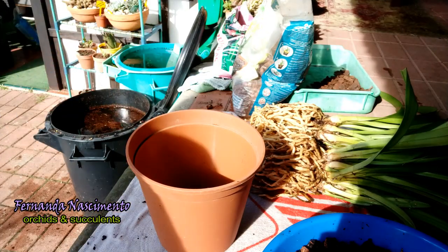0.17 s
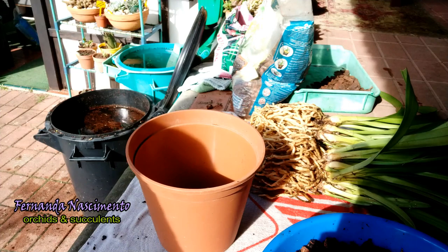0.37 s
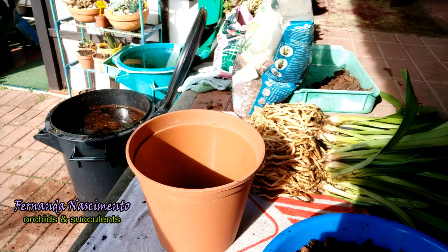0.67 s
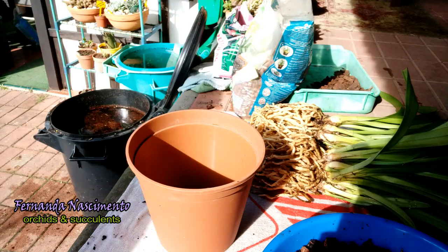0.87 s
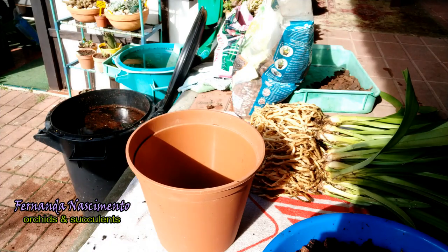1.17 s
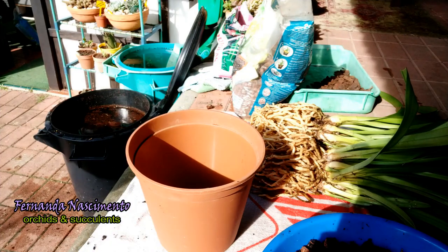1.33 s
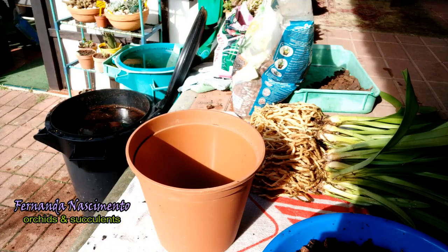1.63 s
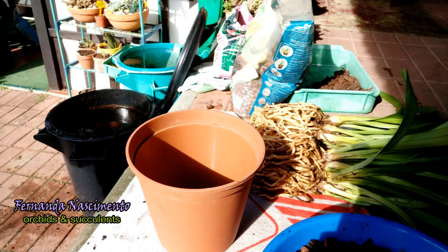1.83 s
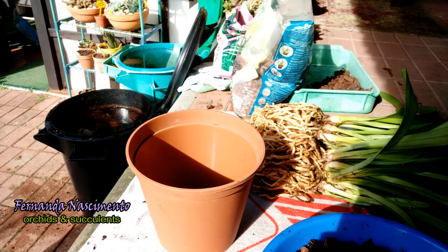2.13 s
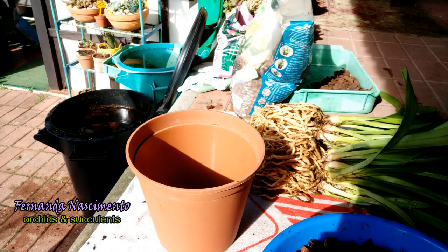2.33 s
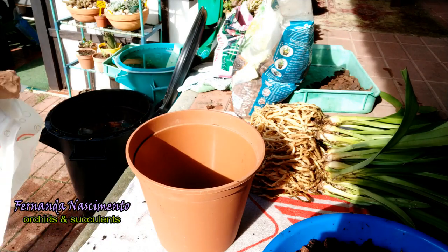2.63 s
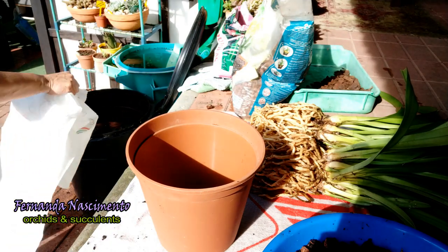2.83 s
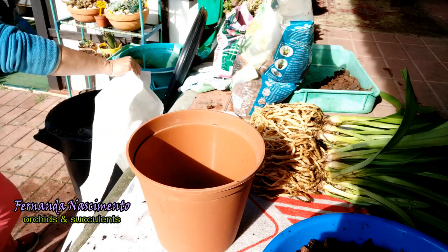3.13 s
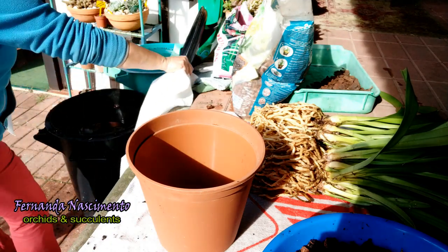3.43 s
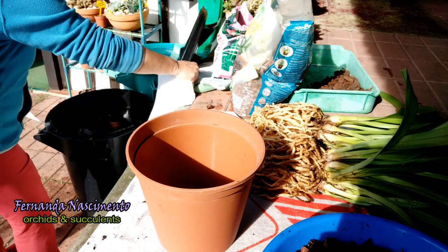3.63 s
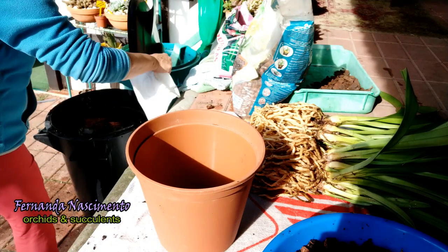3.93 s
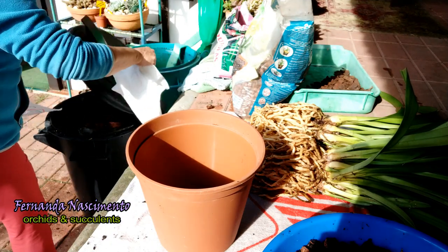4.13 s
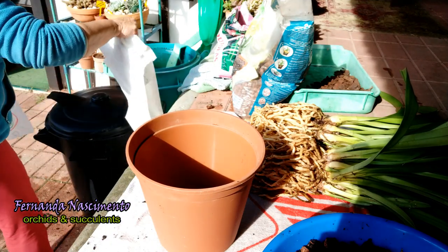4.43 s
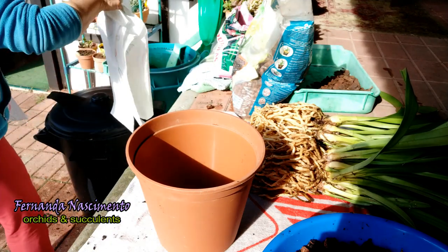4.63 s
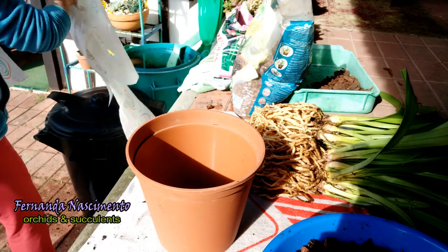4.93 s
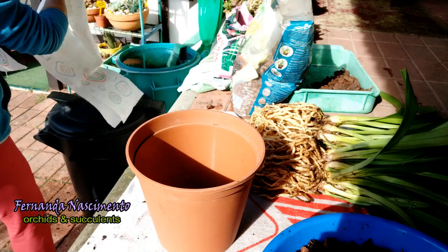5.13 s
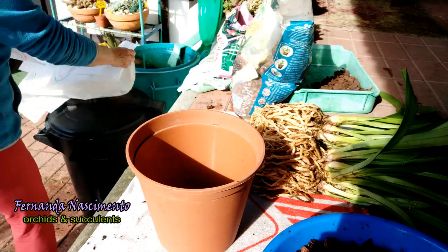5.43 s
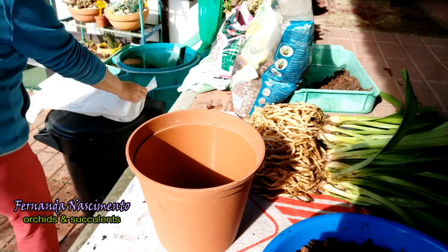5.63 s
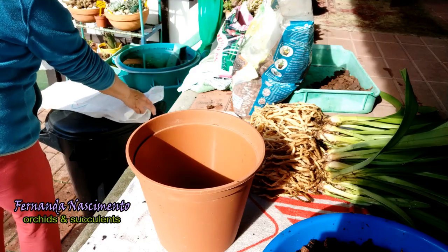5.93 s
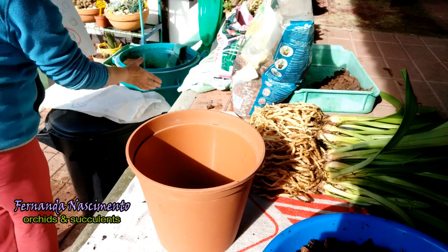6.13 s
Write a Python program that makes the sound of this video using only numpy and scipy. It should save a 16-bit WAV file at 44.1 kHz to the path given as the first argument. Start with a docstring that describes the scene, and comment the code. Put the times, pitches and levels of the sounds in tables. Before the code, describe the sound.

A quiet paved yard, heard close in stereo, with faint outdoor air and tiny distant bird chirps. From 0 to 0.5 s, small dull hollow knocks, strongest near 0.25 s, accompany soft tissue paper rustling and a flick. Around 0.9 to 1.4 s come a clickier knock, papery snaps and a brisk rub. From about 1.5 to 2.2 s a longer rustling pull drags unevenly over something hollow, with light bumps and a broad crackle near 2.1 s. Sparse flicks follow at 2.4 and 3 s, with a stronger one at 3.4 s and soft rubbing afterward. Just after 4.3 s, following a puff of air, a big plastic bin lid scrapes and slams: a hard, loud crack, several rapid chattering blows within a tenth of a second, and a throbbing hollow boom. It settles with faint taps, echoing off walls for under a second. Gentle paper crinkles return from 5 to 5.8 s.

```python
"""Faint outdoor air and small far-off chirps open the scene: shaped noise and falling sine whistles.
On a paved patio someone handles tissue paper: dull knocks (short sine blows and ringing noise),
a long rustling pull and brisk flicks (showers of random clicks), and a drag on something hollow.
Then a big plastic bin lid drops shut: its rim grazes, lands and chatters (filtered noise), and the
hollow bin booms (decaying sine modes). House walls and a distant wall return echoes."""
import sys
import numpy as np
from scipy import signal
from scipy.fft import rfft, irfft, next_fast_len
from scipy.io import wavfile
from scipy.ndimage import uniform_filter1d

SR = 44100
rng = np.random.default_rng(int(sys.argv[2]) if len(sys.argv) > 2 else 0)


def to_wav(s):
    """Save 16-bit WAV."""
    ch = np.atleast_2d(s).T  # columns
    pcm = np.round(np.clip(ch, -1, 1) * 32767)  # PCM
    wavfile.write(sys.argv[1], SR, pcm.astype(np.int16))


N = 277588
TIME = np.arange(N) / SR

# Lid blows on the rim. Each row: time in seconds, relative force in dB.
LID_HITS = [(4.3592, 2), (4.3675, -2), (4.374, -5.5), (4.381, -1), (4.393, -0.5), (4.409, -2.5),
            (4.427, -11)]
# Two bin modes that beat. Each row: frequency in Hz, relative level in dB, decay t60 in seconds.
THROB = [(128, -2.5, .52), (147.5, -3, .56)]


def amp(db):
    """Decibels to gain."""
    return 10 ** (np.asarray(db) / 20)


def unit(x):
    """Scales to rms 1."""
    return x / np.sqrt(np.mean(x ** 2) + 1e-20)


def read(points, hz):
    """Interpolates a table along a log-frequency axis."""
    f, value = np.transpose(points)
    return np.interp(np.log(hz + 1), np.log(f + 1), value)


def add(mix, start_s, sound):
    """Adds a sound to the mix in place, cut at the end of the mix."""
    part = mix[:, round(start_s * SR):][:, :sound.shape[-1]]
    part += sound[..., :part.shape[1]]


def colour(x, spectrum, treble_db=0, shelf_hz=3200, size=4096):
    """Causal filter that keeps the power of white noise, followed by a treble shelf."""
    hz = abs(np.fft.fftfreq(size, 1 / SR))
    shelf = amp(treble_db * hz ** 2 / (hz ** 2 + shelf_hz ** 2))
    gain = unit(amp(read(spectrum, hz))) * shelf
    minimum_phase = np.exp(np.conj(signal.hilbert(np.log(gain + 1e-6))))
    taps = np.fft.ifft(minimum_phase).real[None, :size // 2]
    return signal.oaconvolve(x, taps, axes=1)[:, :x.shape[1]]


def noise(n):
    """White noise at two microphones, most alike in the bass."""
    # Each row: frequency in Hz, left-right coherence.
    likeness = [(60, 1), (130, 0.8), (290, 0.84), (640, 0.43), (1400, 0.1), (16000, 0.081)]
    length = next_fast_len(n, True)
    a, b = rfft(rng.standard_normal((2, length)))
    same = read(likeness, np.fft.rfftfreq(length, 1 / SR))
    right = same * a + np.sqrt(1 - same ** 2) * b
    return irfft(np.array([a, right]), length)[:, :n]


def dying(t60_table, n, size=256):
    """Dense ringing that starts at rms 1; each band dies at its own speed."""
    hz, t, z = signal.stft(noise(n), SR, nperseg=size)
    decay = np.exp(-np.log(1000) * t / read(t60_table, hz)[:, None])
    return signal.istft(z * decay, SR, nperseg=size)[1][:, :n]


def grains(n, per_s, spread_db, smooth):
    """Tiny buckling clicks of uneven size over smooth friction noise."""
    size = amp(spread_db * np.minimum(rng.exponential(1, (2, n)), 4))
    sign = rng.choice([-1, 1], (2, n))
    clicks = size * sign * (rng.random((2, n)) < per_s / SR)
    return unit(unit(clicks) + smooth * noise(n))


def burst(t, rise_s, t60_s):
    """Envelope that swells exponentially to its peak at t = 0 and dies away."""
    return np.exp(np.minimum(t / rise_s, -np.log(1000) * t / t60_s))


def swell(t, rise_s, fall_s, curve):
    """Hand-speed envelope, peak at t = 0; curve above 1 is pointed, below 1 rounded."""
    return np.interp(t, [-rise_s, 0, fall_s], [0, 1, 0]) ** curve


def shimmer(x, depth_db, size=512):
    """Colour that keeps shifting, in patches a few hundred Hz wide and some tens of ms long."""
    z = signal.stft(x, SR, nperseg=size)[2]
    patches = uniform_filter1d(rng.standard_normal(z.shape[1:]), size=4, axis=0)
    patches = unit(uniform_filter1d(patches, size=7, axis=1))
    return signal.istft(z * unit(amp(depth_db * patches)), SR, nperseg=size)[1][:, :x.shape[1]]


def from_left(x, lead_s):
    """Sound from the left reaches the right microphone a little later."""
    return np.array([x[0], np.interp(TIME - lead_s, TIME, x[1])])


def outdoor_air(level_db=-62.5):
    """Steady noise shaped like faint outdoor air, its colour slowly shifting."""
    # Each row: frequency in Hz, density in dB per Hz.
    air_spectrum = [(15, -39.5), (25, -44.5), (70, 3.5), (97, 4), (223, -0.5), (416, -8), (1020, -8.5),
                    (1130, -12), (1890, -7.5), (2690, -10.5), (3920, -12), (5140, -17), (11000, -18.5),
                    (14800, -23), (16000, -39)]
    return amp(level_db) * shimmer(colour(noise(N), air_spectrum), depth_db=1.5)


def birds(level_db=0, trill_depth=0.056, fall_oct_per_s=3.1):
    """Short, burry falling whistles, smeared by the walls between them and the patio."""
    # Each row: start in seconds, length in seconds, start pitch in Hz, relative level in dB.
    chirps = [(0, 0.032, 3520, -54.5), (0.061, 0.094, 2695, -58.5), (0.341, 0.13, 4490, -62.5),
              (2.534, 0.059, 2126, -61.5), (2.78, 0.034, 2460, -64), (3.533, 0.04, 3970, -58.5),
              (4.836, 0.043, 3983, -55), (4.878, .05, 3660, -57), (5.63, 0.14, 4170, -59),
              (6.2, 0.097, 1046, -62)]
    out = np.zeros((2, N))
    for start_s, length_s, start_hz, db in chirps:
        n = int(length_s * SR)
        wobble = 1 + trill_depth * unit(uniform_filter1d(rng.standard_normal(n), size=50))
        hz = start_hz * 2 ** (-fall_oct_per_s * TIME[:n]) * wobble
        call = np.sin(2 * np.pi * np.cumsum(hz) / SR) * unit(np.hanning(n))
        scatter = dying([(2000, 0.086), (5000, 0.16)], SR // 4)
        scatter = scatter / np.linalg.norm(scatter[0])
        add(out, start_s, amp(db + level_db) * signal.fftconvolve(call[None], scatter, axes=1))
    return out


def rebounds(count=4, duller_db=5):
    """Each knock repeats, weaker and duller: (s, level dB, pitch Hz, click dB)."""
    # Each row: start in seconds, relative level in dB, pitch in Hz, relative click level in dB,
    # rebound gap in seconds, loss per rebound in dB.
    knock_rows = [(.072, -54.5, 387, -23, 0.065, 1), (.208, -39, 330, -26, .009, 6),
                  (.244, -31.5, 287, -8, .012, 12), (0.323, -45, 94, -19, 0.017, 17),
                  (.506, -53.5, 76, -29, 0.049, 1), (0.933, -35.5, 280, 10, 0.016, 7),
                  (0.9993, -47.5, 400, -5, 0.016, 4), (1.19, -42.5, 530, -7, 0.023, 17),
                  (1.242, -35, 400, -13, 0.038, 5.5), (1.492, -42, 430, 4.5, 0.047, 0.5),
                  (1.598, -42.5, 495, -17, .024, 2), (1.695, -41, 517, 5.5, 0.058, 5),
                  (1.786, -44, 390, -15, .06, 2), (1.873, -42.5, 388, -12, 0.032, 10),
                  (2.035, -42, 227, -8, 0.043, 2), (2.507, -44.5, 234, -7, .02, 7),
                  (3.172, -46.5, 278, 8.5, 0.026, 5), (3.548, -50, 168, 3, .046, 2)]
    return [(s + k * gap_s, db - k * loss_db, hz, click_db - k * duller_db)
            for s, db, hz, click_db, gap_s, loss_db in knock_rows for k in range(count)]


def knocks(blow_db=1, body_db=-13, cycles=0.38, snap_db=25):
    """A blow of a cycle or two and a small click, with a short hollow rattle."""
    # Each row: frequency in Hz, decay t60 in seconds.
    rattle_t60 = [(100, 0.155), (450, 0.21), (1500, 0.2), (8000, 0.2)]
    # The hollow thing that is struck. Each row: frequency in Hz, density in dB per Hz.
    hollow_spectrum = [(40, -28.5), (90, 2), (140, -3.5), (200, -0.5), (310, -3.5), (390, 2.5), (440, -4.5),
                       (495, 4.5), (600, 3), (800, -3.5), (1500, 6), (6000, -8)]
    click_spectrum = [(100, 4), (1000, 7.5), (3200, -3.5), (5000, -15.5), (16000, -22)]
    blows, bodies, clicks = np.zeros((3, 2, N))
    n = SR // 5
    rattles = [dying(rattle_t60, n) for _ in range(8)]
    for k, (s, db, hz, click_db) in enumerate(rebounds()):
        turns, rattle = hz * TIME[:n], rattles[k % len(rattles)]
        envelope = np.sqrt(turns / cycles) * np.exp(1 - turns / cycles)
        blow = -np.sin(2 * np.pi * turns) * envelope
        body = signal.fftconvolve(rattle, blow[None] / np.linalg.norm(blow), axes=1)
        click = rattle / amp(snap_db) - (turns == 0)
        add(blows, s, amp(db + blow_db) * blow)
        add(bodies, s, amp(db + body_db) * body)
        add(clicks, s, 2 * amp(db + click_db) * click)
    sound = blows + colour(bodies, hollow_spectrum) + colour(clicks, click_spectrum)
    return signal.sosfilt(signal.butter(2, 55, "high", fs=SR, output="sos"), sound)


def rustle(rub_db=-1, crinkle_db=-1, catch_db=2, curve=0.93):
    """Sliding paper: a soft rub and a fine crinkle, both catching unevenly."""
    # Each row: time of peak, rise and fall in seconds, relative rub and crinkle levels in dB.
    strokes = [(0.145, 0.015, 0.51, -61, -61.5), (.31, 0.18, .05, -63, -62.5), (.82, 0.051, .25, -61, -66),
               (1.3, .07, .1, -47.5, -54.5), (1.615, 0.069, .13, -55, -58.5),
               (1.71, 0.05, 0.16, -57.5, -67), (1.845, 0.074, 0.26, -49, -58),
               (1.945, .09, 0.14, -56.5, -56), (3.43, 0.034, .27, -55, -69), (3.645, 0.079, .17, -55, -62),
               (4, 0.35, .3, -60, -64), (4.12, 0.13, 0.063, -57.5, -53.5), (5.01, 0.069, .14, -64.5, -64),
               (5.32, 0.11, .07, -71, -66), (5.49, 0.039, .06, -61.5, -57.5), (5.7, 0.098, .06, -57, -59.5)]
    # Both spectra, each row: frequency in Hz, density in dB per Hz.
    rub_spectrum = [(50, -10.5), (130, -19), (420, -3), (700, -1), (1200, -3.5), (2400, -6.5),
                    (4000, -10.5), (7000, -22.5), (16000, -60.5)]
    crinkle_spectrum = [(500, -46), (2000, -13), (4000, -0.5), (7000, 4.5), (10500, 2), (14000, 0.5),
                        (16000, -37.5)]
    rub_level, crinkle_level = np.zeros((2, N))
    for top_s, rise_s, fall_s, rub, crinkle in strokes:
        speed = swell(TIME - top_s, rise_s, fall_s, curve)
        rub_level = np.hypot(rub_level, speed * amp(rub + rub_db))
        crinkle_level = np.hypot(crinkle_level, speed * amp(crinkle + crinkle_db))
    drift = uniform_filter1d(uniform_filter1d(rng.standard_normal(N), size=400), size=200)
    catch = amp(catch_db * unit(drift))
    rub_sound = colour(grains(N, 500, 4, .7), rub_spectrum)
    crinkle_sound = colour(grains(N, 1300, 3.5, 1), crinkle_spectrum)
    return catch * (rub_level * rub_sound + crinkle_level * crinkle_sound)


def flicks(level_db=-1, snap_db=12.5, ring_db=-1, ring_q=6, t60_s=0.23):
    """A sheet pulled taut snaps and lets go a dense shower of crackles that ring in the sheet."""
    # Each row: time of snap in seconds, relative level in dB, rise in seconds, treble shelf in dB,
    # ring of the sheet in Hz.
    flick_rows = [(.321, -48, 0.0051, -23, 1220), (1.0, -46.5, 0.0077, 2, 1630),
                  (1.246, -52.5, 0.008, 10, 2400), (1.364, -46.5, .002, -2.5, 2400),
                  (2.072, -40.5, .022, -11, 1940), (2.435, -51, 0.0038, 11.5, 2250),
                  (2.958, -42.5, 0.0049, -1.5, 890), (2.983, -44, .008, -5, 3400),
                  (3.36, -37.5, 0.0065, -6.5, 1050)]
    # Each row: frequency in Hz, density in dB per Hz.
    paper_spectrum = [(40, -57), (120, -4), (250, -11), (550, -5.5), (1000, -2), (1500, -5), (3600, -7),
                      (5500, -11), (9000, -11.5), (13000, -16.5), (16000, -27)]
    snap_rise_s = 0.0032  # a pull that rises faster than this snaps harder
    out, lead = np.zeros((2, N)), SR // 10
    t = (np.arange(SR // 2) - lead) / SR
    for s, db, rise_s, treble_db, hz in flick_rows:
        shower = burst(t, rise_s, t60_s) * grains(len(t), 3500, 2.7, 1)
        shower[:, lead] += amp(snap_db) * snap_rise_s / rise_s
        sheet = colour(shower, paper_spectrum, treble_db)
        ring = signal.lfilter(*signal.iirpeak(hz, ring_q, fs=SR), sheet)
        add(out, s + t[0], amp(db + level_db) * (sheet + amp(ring_db) * ring))
    return out


def drag(slips_per_s=170, level_db=-54.5):
    """The long pull: quick uneven slips ring the resonances of something hollow."""
    # Each row: frequency in Hz, width in Hz, gain in dB.
    drag_modes = [(390, 28, -3), (442, 37, 4), (488, 36, 0), (616, 50, 0), (730, 45, -18), (876, 75, 1.5),
                  (1200, 190, 2)]
    slips = grains(N, slips_per_s, 2.1, 0.16)
    slips = slips + .5 * slips[::-1]  # each microphone also hears the other's slips at half level
    ring = np.zeros((2, N))
    for hz, width_hz, gain_db in drag_modes:
        ring += amp(gain_db) * signal.lfilter(*signal.iirpeak(hz, hz / width_hz, fs=SR), slips)
    pull = swell(TIME - 1.815, rise_s=0.35, fall_s=0.37, curve=0.31)
    return amp(level_db) * pull * unit(ring)


def lid_fall(puff_db=-51, graze_db=-25, graze_s=4.349, bite_s=.0072, bite_db=5):
    """The falling lid pushes air out, then its edge scrapes past the lip of the bin."""
    puff_spectrum = [(40, -11), (130, 2.0), (400, 0.5), (1400, -4.5), (2800, -10),
                     (4500, -35.0), (12000, -49.5)]
    graze_spectrum = [(300, -20.0), (3400, -34), (4500, -2.5), (7000, -8), (10000, -3.0), (16000, -16)]
    out, start_s = np.zeros((2, N)), 4.2
    t = start_s + TIME[:SR // 2]
    puff = colour(noise(len(t)), puff_spectrum) * burst(t - 4.322, 0.0065, .7)
    graze = colour(grains(len(t), 5000, 3, 0.89), graze_spectrum)
    touch = amp(graze_db) * burst(t - graze_s, 0.0013, 0.038)
    bite = amp(graze_db + bite_db) * burst(t - graze_s - bite_s, 0.0013, 0.038)
    add(out, start_s, amp(puff_db) * puff + graze * (touch + bite))
    return out


def contacts(count=4):
    """Lid blows, then even, weakening taps as it rocks to rest: (s, force dB, treble dB)."""
    settle_gap_s, settle_db, settle_loss_db = .051, -29, 2
    # the bare edge lands first, then the lid lies flatter and sounds softer
    hard_first_db, hard_last_db, soften_s = 2, -13, 0.026
    first_s, last_s = LID_HITS[0][0], LID_HITS[-1][0]
    taps = [(last_s + (k + 1) * settle_gap_s, settle_db - k * settle_loss_db) for k in range(count)]
    rows = []
    for s, force_db in list(LID_HITS) + taps:
        edge = np.exp(-((s - first_s) / soften_s) ** 2)
        rows.append((s, force_db, hard_last_db + (hard_first_db - hard_last_db) * edge))
    return rows


def lid(walls_db=-20, crack_db=17):
    """Each contact cracks and sets off short, overlapping resonances of the plastic walls."""
    # Each row: frequency in Hz, density in dB per Hz.
    wall_spectrum = [(20, -31), (45, -28), (70, -9.5), (110, -17), (170, -8.5), (270, -5), (420, -3),
                     (750, -2), (1300, -11), (1900, -8), (3500, -11), (6500, -17.5), (10000, -21.5),
                     (16000, -28.5)]
    # Each row: frequency in Hz, decay t60 in seconds.
    wall_t60 = [(100, 0.57), (500, 0.2), (1500, 0.32), (4000, 0.27), (9000, 0.23), (13000, 0.26),
                (15500, 0.083)]
    out = np.zeros((2, N))
    for s, force_db, treble_db in contacts():
        clatter = dying(wall_t60, SR // 2)
        clatter[:, 0] -= amp(crack_db)
        add(out, s, amp(force_db + walls_db) * colour(clatter, wall_spectrum, treble_db))
    return out


def boom(level_db=-26, in_step_s=.0195):
    """Every contact adds energy to the bin's modes, which drift out of step and throb."""
    # All modes of bin and lid, THROB first. Each row: frequency in Hz, relative level in dB,
    # decay t60 in seconds.
    bin_modes = THROB + [(82.5, -13.5, 0.55), (104.8, 1, 0.16), (167.6, -8.5, .4), (189.0, -6, .3),
                 (255.5, -10.5, 0.48), (307.0, -2.5, 0.21), (324, -11.5, .45), (354, -5.5, .18),
                 (438, -14.5, .19), (457, -22.5, 0.31), (504.0, -1.5, 0.28), (522, -23.0, 0.99),
                 (540, -2.5, .24), (665, -9.5, .24), (694, -14, 0.27), (795.0, -8, 0.38),
                 (887.0, -8.5, .23), (957, -9, .3), (1080, -8, 0.21), (1232, -4.5, 0.33), (1339, -11, 0.2),
                 (1377, -7, .24), (1470, -27.0, 0.19), (1510, -12, .22), (1872, -8, 0.29),
                 (1990, -10.5, .22), (2310, -12, 0.24), (2760, -10.5, 0.34)]
    out, t, start_s = np.zeros((2, N)), TIME[:SR], LID_HITS[0][0]
    for hz, db, t60_s in bin_modes:
        energy = np.zeros(len(t))
        for s, force_db, _ in contacts():
            age = t - (s - start_s)
            decay = np.exp(-np.log(1000) * abs(age) / t60_s)
            energy += (age >= 0) * (amp(force_db) * decay) ** 2
        tone = np.sin(2 * np.pi * hz * (t - in_step_s))
        add(out, start_s, amp(level_db + db) * np.sqrt(energy) * tone)
    return out


def yard(x, wet_db, build_s):
    """The echo from house walls and paving: it builds up, then darkens as it dies."""
    # Each row: frequency in Hz, decay t60 in seconds.
    yard_t60 = [(100, 1), (500, 1), (1500, 0.78), (4000, 0.62), (9000, 0.21), (16000, 0.12)]
    yard_spectrum = [(80, -1), (500, -7), (1500, -7.5), (4000, -8.0), (16000, 3.5)]
    tail = dying(yard_t60, SR) * (1 - np.exp(-(TIME[:SR] / build_s) ** 2))
    tail = colour(tail / np.linalg.norm(tail[0]), yard_spectrum)
    return amp(wet_db) * signal.fftconvolve(x, tail, axes=1)[:, :N] / 2


def far_wall(x, echo_db, delay_s=0.27):
    """One faint, dull echo comes back from a distant wall."""
    echo_spectrum = [(100, 3), (300, -3.0), (520, 6), (800, -11), (1500, -16), (8000, -37)]
    out = np.zeros((2, N))
    add(out, delay_s, amp(echo_db) * colour(x, echo_spectrum))
    return out


def scene():
    """Paper, knocks and lid in the yard, with birds and outdoor air behind."""
    clatter = shimmer(lid(), depth_db=0.5) + lid_fall()
    bin_ring = from_left(boom(), .00025)
    paper = shimmer(flicks() + rustle(), depth_db=2.5)
    near = clatter + from_left(knocks() + drag(), 0.00034) + paper
    echoes = yard(near + 0.68 * bin_ring, wet_db=-18, build_s=0.032)
    echoes = echoes + far_wall(clatter + bin_ring, echo_db=-49)
    return near + bin_ring + echoes + birds() + outdoor_air()


def record(dry):
    """Two microphones of slightly different colour, then a low-pass band limit."""
    # Each row: frequency in Hz, left-right difference in dB.
    balance = [(100, -0.7), (400, -0.9), (1300, -1), (4400, -1.3), (8000, -0.3), (15000, 4.5)]
    edge_hz = 15900
    length = next_fast_len(N, True)
    tilt_db = read(balance, np.fft.rfftfreq(length, 1 / SR)) * np.array([[.5], [-.5]])
    heard = irfft(rfft(dry, length) * amp(tilt_db), length)[:, :N]
    low_pass = signal.firwin(511, edge_hz, window=("kaiser", 9), fs=SR)
    return signal.oaconvolve(heard, low_pass[None], "same")


dry = scene()
out = record(dry)
to_wav(out)
```